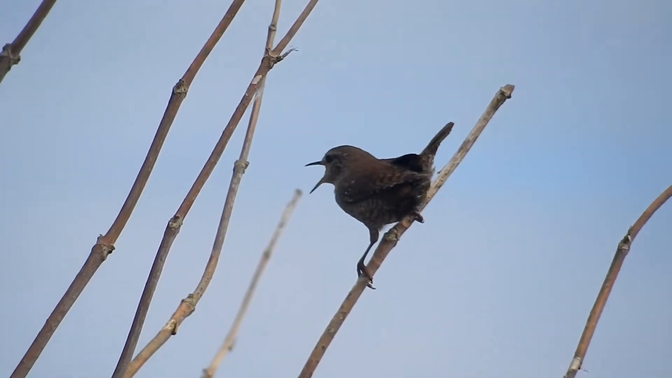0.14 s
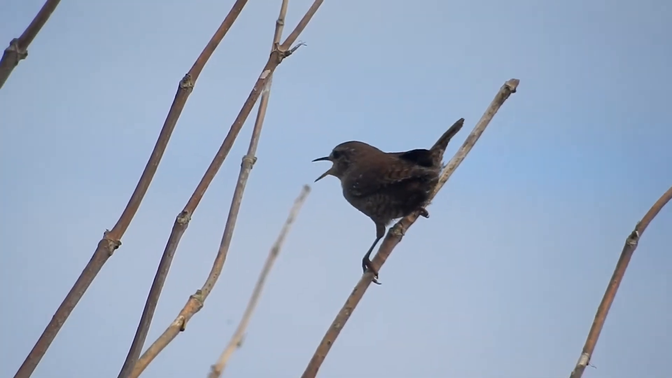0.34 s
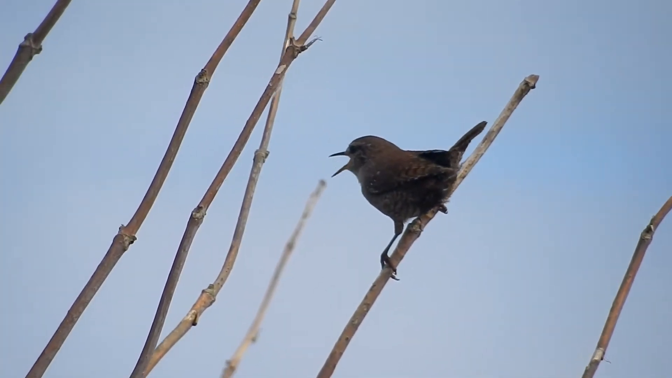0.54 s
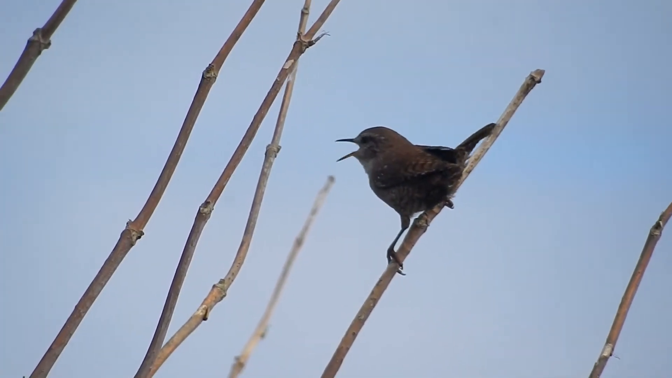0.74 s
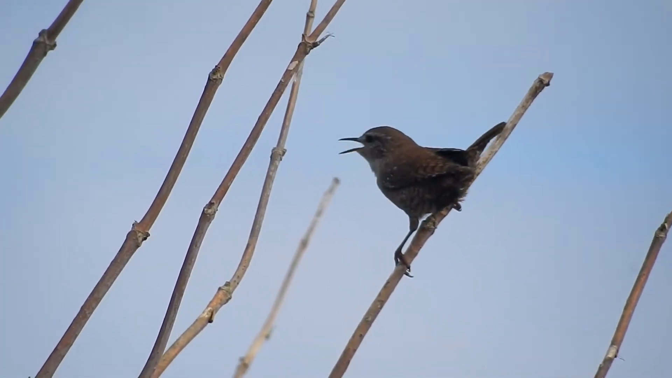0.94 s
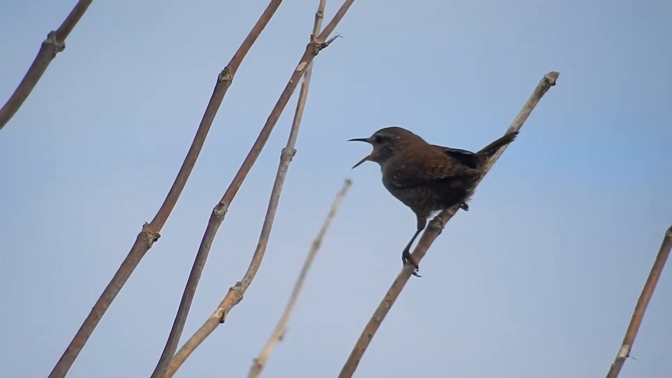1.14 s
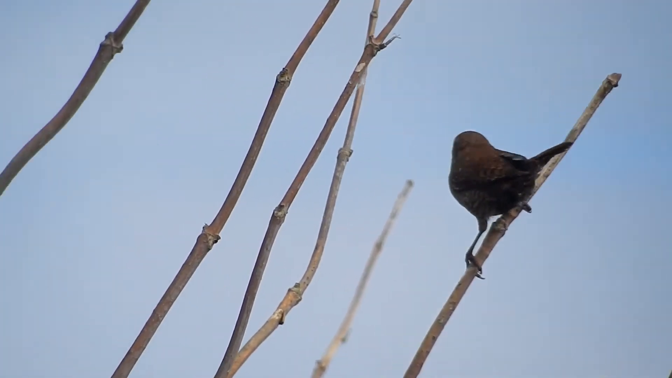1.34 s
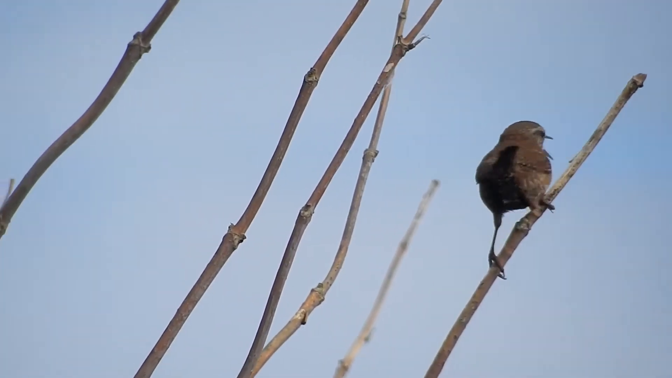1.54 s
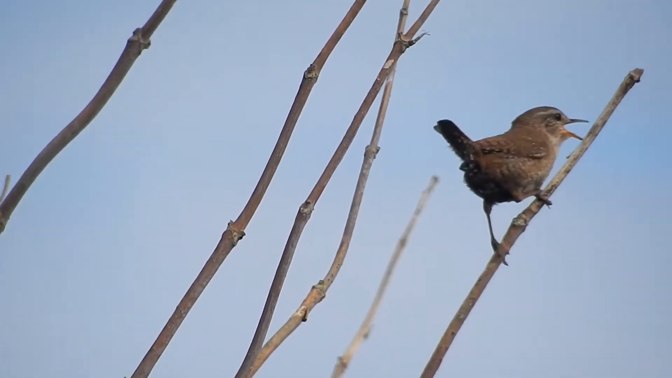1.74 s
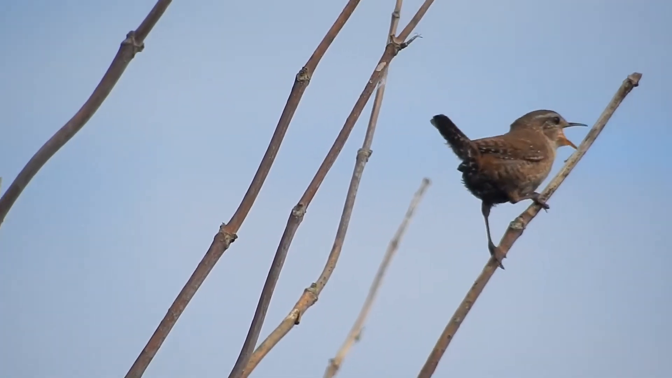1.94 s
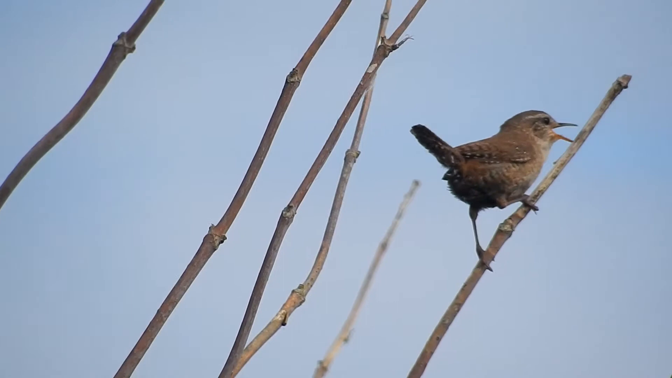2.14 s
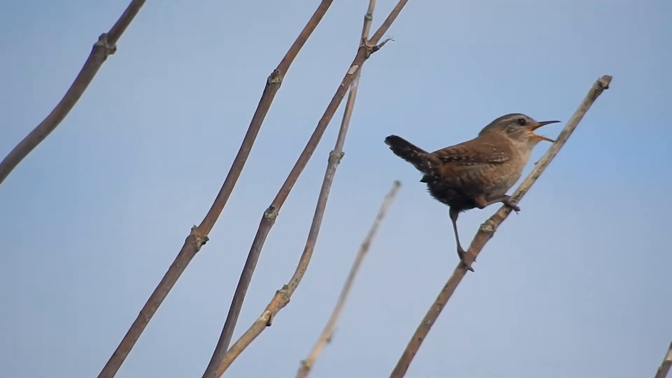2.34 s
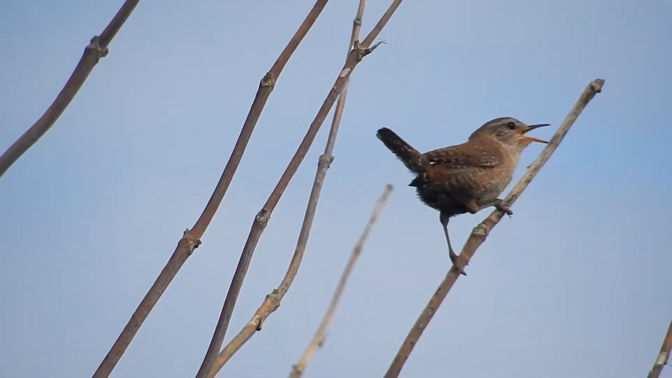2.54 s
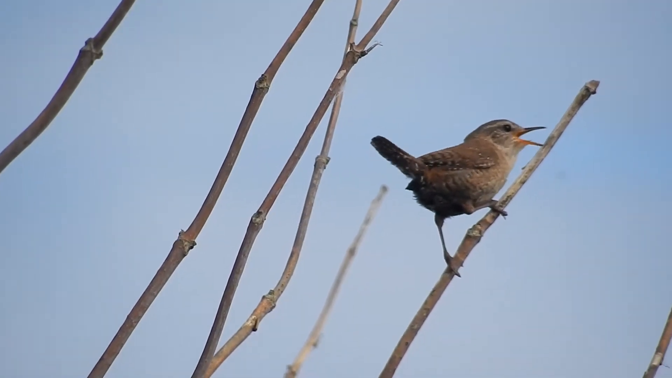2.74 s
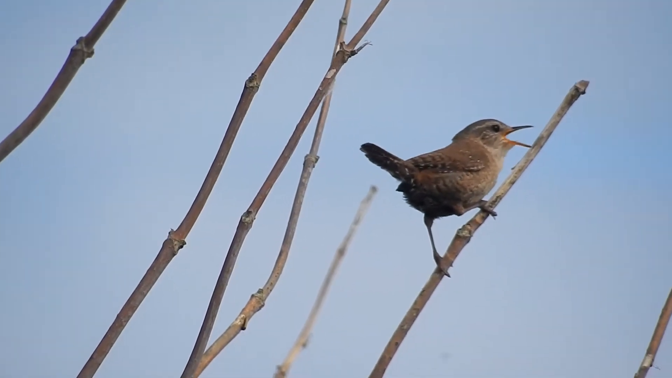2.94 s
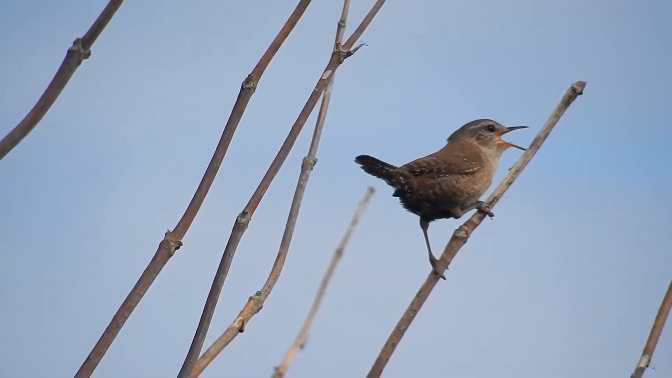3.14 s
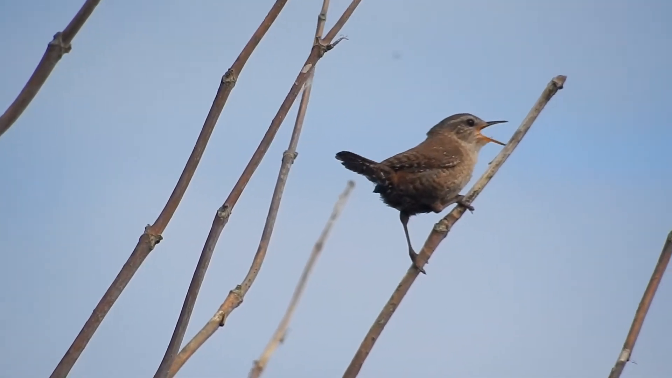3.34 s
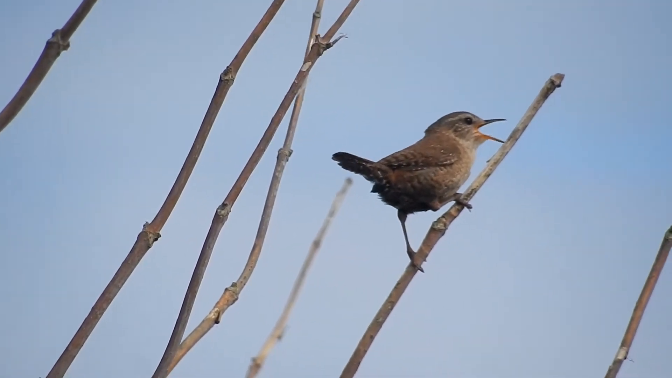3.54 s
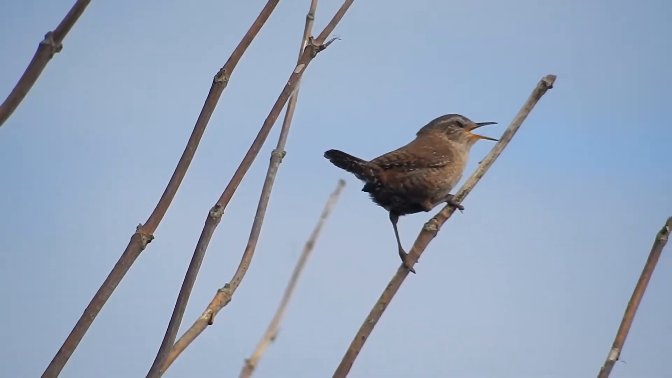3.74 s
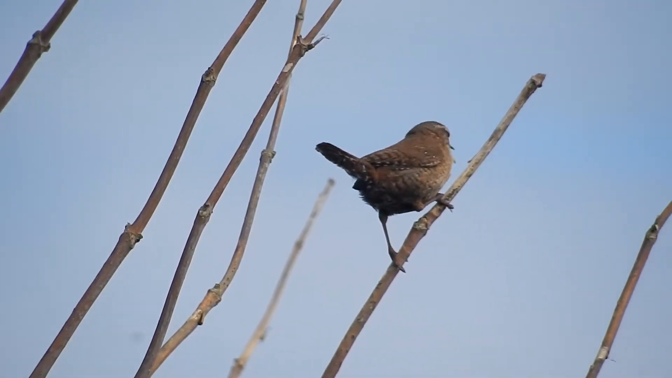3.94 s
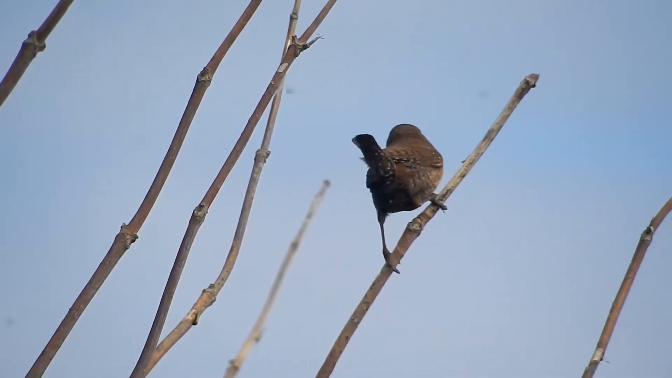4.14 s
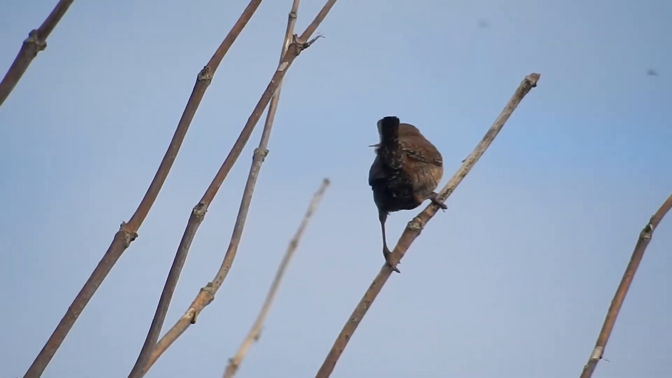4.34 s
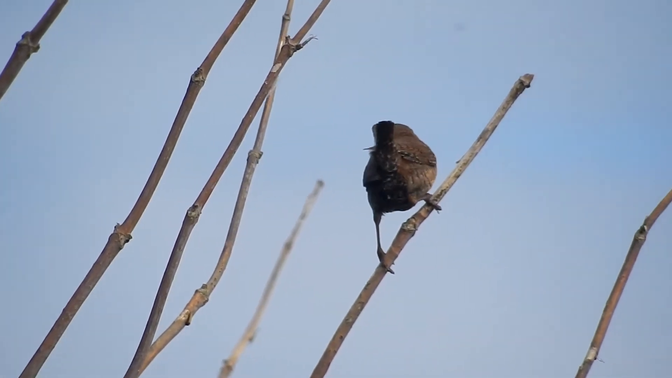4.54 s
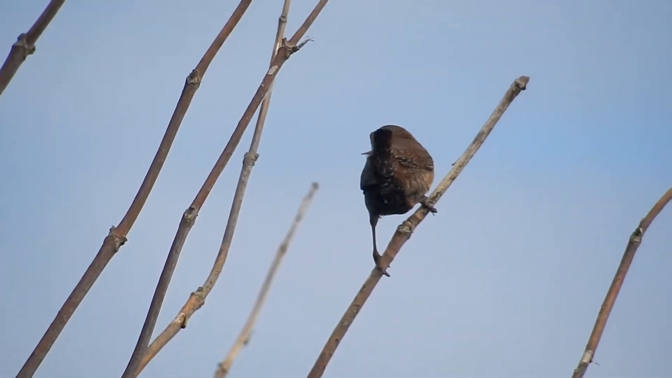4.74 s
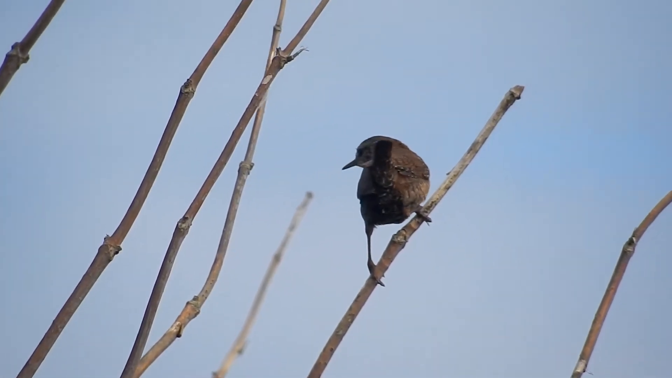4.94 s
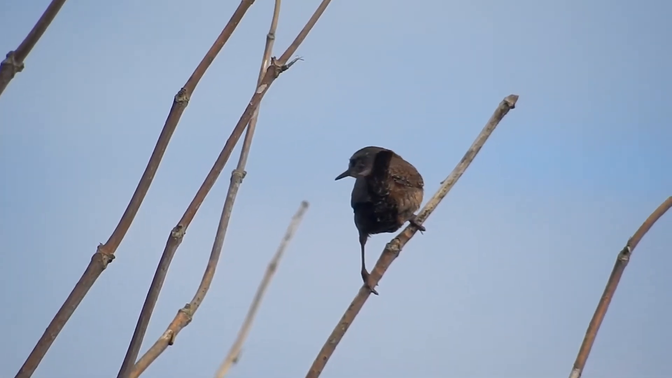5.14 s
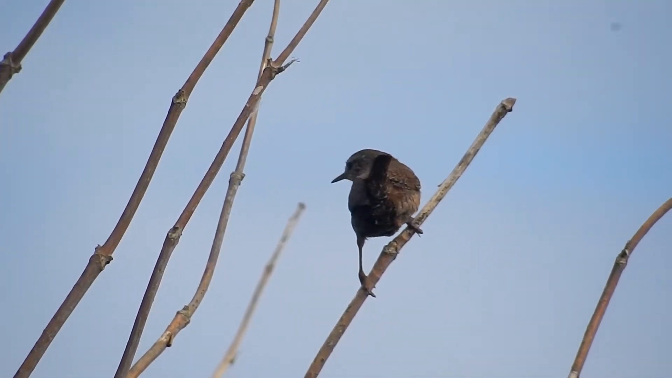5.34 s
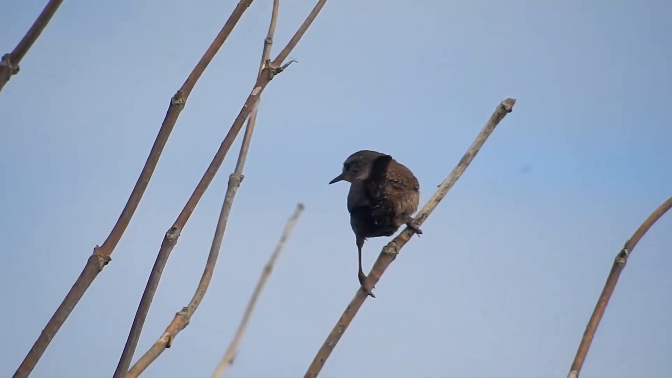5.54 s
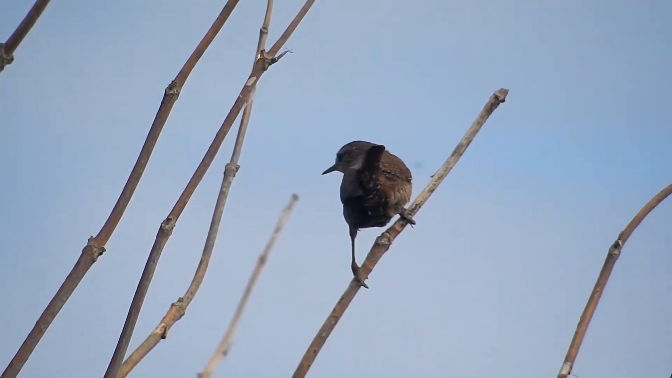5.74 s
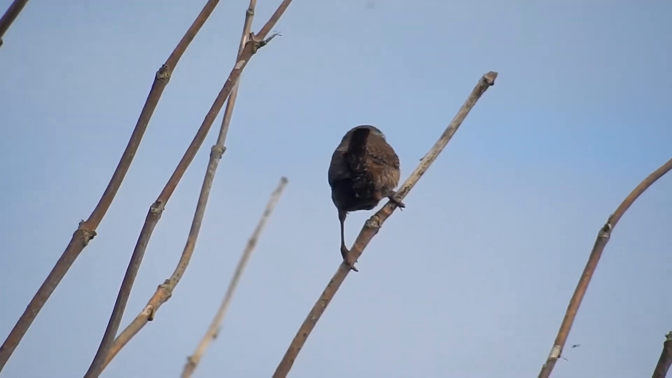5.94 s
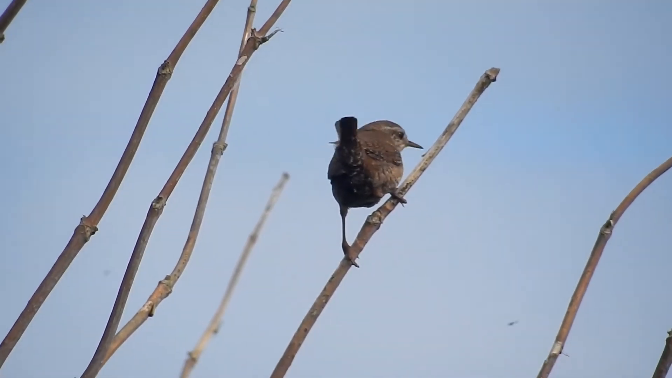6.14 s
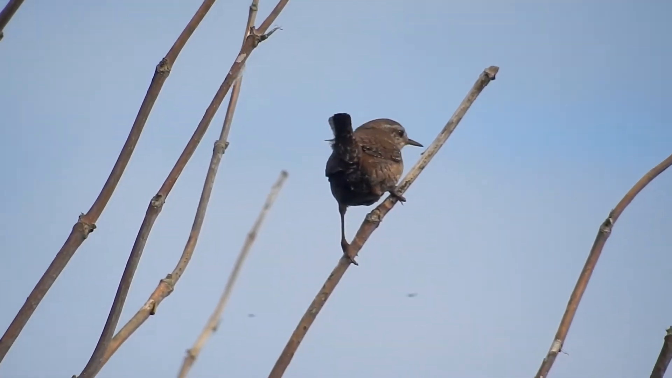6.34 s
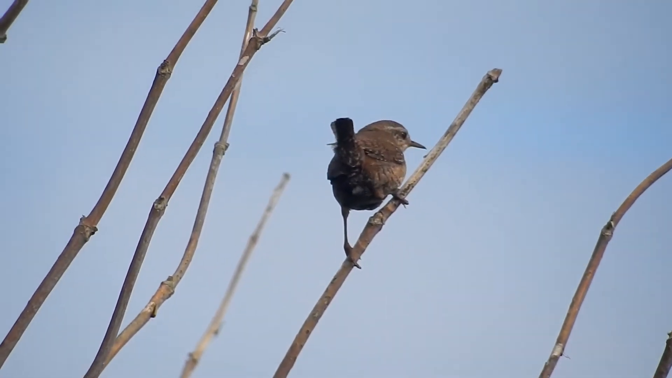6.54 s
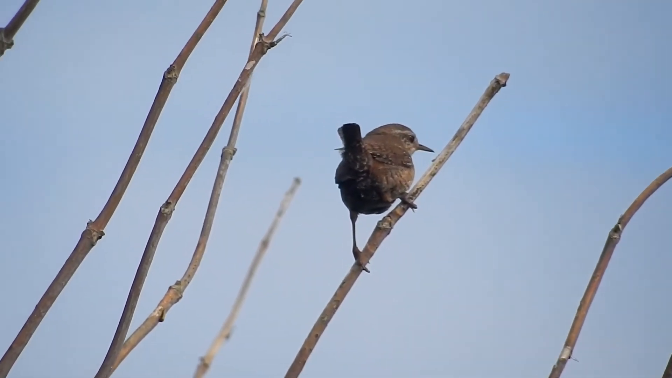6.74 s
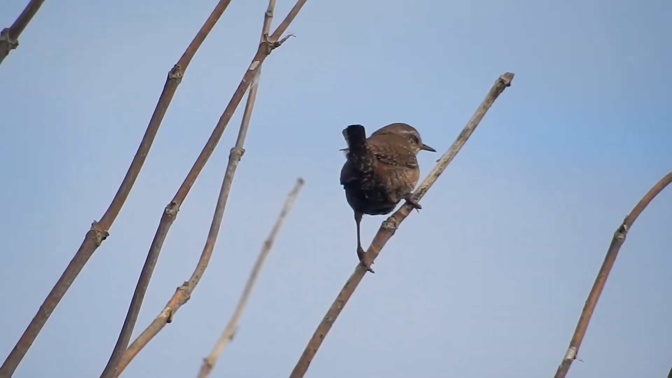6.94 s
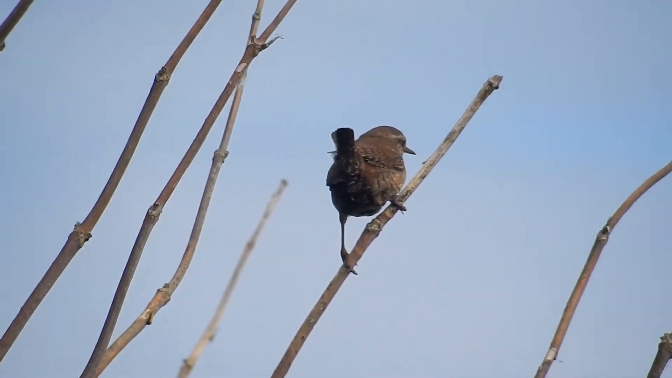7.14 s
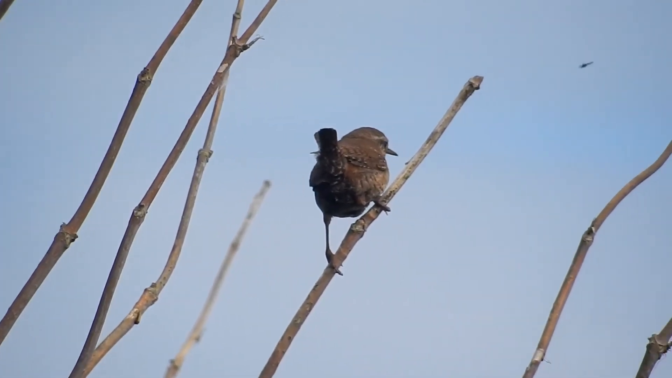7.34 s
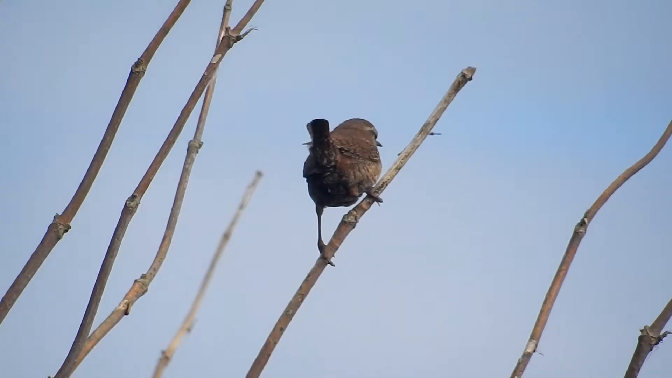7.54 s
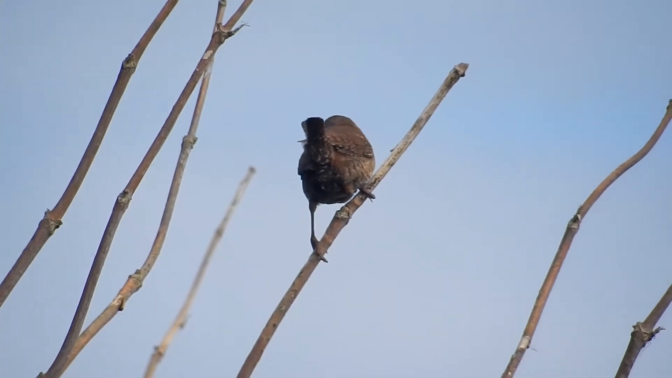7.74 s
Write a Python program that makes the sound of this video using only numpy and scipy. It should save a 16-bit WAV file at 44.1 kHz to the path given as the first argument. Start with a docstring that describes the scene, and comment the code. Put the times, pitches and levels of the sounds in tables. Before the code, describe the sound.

From the very start a wren sings loudly close ahead, in the centre. Until about 1.55 s come quick, separate whistles, some falling steeply, some arching up to around 8 kHz, with a tiny stutter of pips near 0.7 s; two barely audible soft flicks of movement fall near 1.4 and 1.5 s. A dry, rapid rattle of alternating weak and strong ticks runs from 1.6 to 2.1 s, growing slightly, followed by a few whistles. From 2.6 to 3.8 s seven pulsing trill syllables, each pips plus an arched whistle, slow and weaken slightly. Three last notes end at about 4.3 s. Short scattered echoes trail each note. For the remainder, to about 7.9 s, only faint far birds give thin blurred slurs and chirps. Light wind rumbles low and unevenly on the microphone throughout, with early thumps and more around 4.3-4.7 s, above quiet outdoor hiss.

```python
"""A wren on a bare twig starts at once with slurred whistles and one stutter of pips.
It flicks round on its perch, then sings a dry rattle, a trill of arched syllables and three last notes.
Its notes are nearly pure gliding tones with faint overtones, and scrub and trees scatter each one back.
All along, shaped noise makes light wind rumbling on the microphone and a quiet outdoor hiss.
Other birds call far off, as thin slurs blurred by echoes."""
import sys
import numpy as np
from scipy import signal
from scipy.fft import rfft, irfft, next_fast_len
from scipy.io import wavfile
from scipy.ndimage import uniform_filter1d

SR = 44100
rng = np.random.default_rng(int(sys.argv[2]) if len(sys.argv) > 2 else 0)


def store_pcm(level_fs):
    """Save levels as 16-bit WAV."""
    pcm = np.round(np.clip(level_fs, -1, 1) * 32767).astype(np.int16)
    wavfile.write(sys.argv[1], SR, np.atleast_2d(pcm).T)


N = 347508
TIME = np.arange(N) / SR  # seconds


def from_db(db):
    """Turn decibels into gain."""
    return 10 ** (np.asarray(db) / 20)


def rms_one(x):
    """Scale a sound to an rms (average strength) of 1."""
    return x / np.sqrt(np.mean(x ** 2) + 1e-20)


def at_hz(points, hz):
    """Read a curve of (Hz, value) points along a log-frequency axis."""
    known_hz, values = np.transpose(points)
    return np.interp(np.log(hz + 0.0011), np.log(known_hz), values)


def add(track, start_s, sound):
    """Mix a sound into a track from a given time on."""
    at = max(round(start_s * SR), 0)
    track[at:at + len(sound)] += sound[:max(N - at, 0)]


def drift(rate, size=N):
    """Slow random wandering with a spread near 1, changing about `rate` times a second."""
    pole = np.exp(-2 * np.pi * rate / SR)
    run_in = SR // 5  # samples that let the filter settle, then are dropped
    noise = rng.standard_normal(size + run_in)
    return rms_one(signal.lfilter([1], [1, -2 * pole, pole * pole], noise))[-size:]


def band(x, low_hz, high_hz):
    """Keep one band of pitches, with gentle edges."""
    edges_hz = [low_hz, min(high_hz, SR / 2 - 1000)]
    return signal.sosfilt(signal.butter(2, edges_hz, "band", fs=SR, output="sos"), x)


def stereo_noise(spectrum, likeness):
    """Coloured noise of rms 1; its two channels are as alike as asked at each frequency."""
    size = next_fast_len(N)
    hz = np.fft.rfftfreq(size, 1 / SR)
    mid, side = rfft(rng.standard_normal((2, size)))
    alike = np.clip(at_hz(likeness, hz), -1, 1)
    pair = np.sqrt(1 + alike) * mid + np.sqrt(1 - alike) * side * [[1], [-1]]
    # fade out above the last point of the spectrum
    roll_off = 1 / (1 + (hz / (2 * spectrum[-1][0])) ** 4)
    colour = roll_off * from_db(at_hz(spectrum, hz))
    return rms_one(irfft(pair * colour, size)[:, :N])


def wren():
    """The whole strophe: slides and arches, a stutter of pips, the rattle and the trill."""
    # whistles that settle on a pitch, then glide: start_s, length_s, settle_s [s],
    # entry_hz, settled_hz, last_hz, bow_hz (bow of the glide) [Hz], first_db, last_db [dB]
    slides = [(0, 0.039, .002, 3900, 3910, 3586, 30, -15.5, -26.5),
              (0.286, .265, .016, 7904, 7476, 7068, -10.5, -16.5, -33),
              (0.575, 0.08, .013, 4110, 4080, 3704, 10, -27, -20),
              (0.74, 0.055, 0.0028, 4890, 4860, 3084, -260, -15.5, -28),
              (.902, 0.05, 0.003, 4730, 4662, 4438, -49.5, -16.5, -23.5),
              (1.008, .108, .010, 2690, 2943, 3378, 0, -34, -24.5),
              (1.368, .053, .005, 4520, 5150, 3266, -210, -16, -24),
              (2.237, 0.087, .029, 5596, 4835, 4615, -1.5, -15.5, -19.5),
              (3.888, .084, 0.019, 4990, 4770, 4792, -29.5, -18, -24),
              (4.126, 0.16, .038, 7310, 5530, 6000, 254, -24, -29.5)]
    # whistles that rise, hold and fall: start_s, length_s, rise_s, fall_s [s],
    # entry_hz, top_hz, exit_hz, droop_hz (droop of the top) [Hz], level_db, sag_db (mid-note), swell_db [dB]
    arches = [(.086, 0.091, .011, 0.038, 4730, 5290, 4460, 19, -18, -1, 1.5),
              (0.212, 0.02, 0.0062, 0.012, 2920, 3170, 2740, -1, -39, -6, -2),
              (0.846, 0.056, 0.023, .040, 5520, 7210, 4600, -0.5, -19, 4, 8),
              (1.176, .166, .024, .048, 7720, 8257, 6940, 279, -22, 12, 1),
              (1.475, .088, 0.0088, 0.026, 4780, 5210, 4490, -89.5, -17, 0, 2),
              (2.126, .051, .029, 0.03, 5500, 7650, 6580, 0.5, -20.5, -3, -1),
              (2.357, .028, 0.0073, 0.013, 3550, 3945, 3640, -2.5, -27, -6.5, 1.5),
              (2.418, .120, 0.024, 0.03, 5400, 6340, 4940, 17.5, -15.5, 8, 1.5),
              (4.011, 0.03, 0.01, 0.015, 2750, 2960, 2620, -4, -39.5, -2, -2)]
    notes = [slide(*row) for row in slides] + [arch(*row) for row in arches]
    # a stutter of pips leads into the first steep downslur
    notes += lead_in(.743, -22.5, count=4)
    notes += rattle() + trill()
    song = np.zeros(N)
    for start_s, note in notes:
        add(song, start_s, note)
    return song


def slide(start_s, length_s, settle_s, entry_hz, settled_hz, last_hz, bow_hz, first_db, last_db):
    """A whistle that gains force as it settles on its pitch, then follows one bowed glide."""
    onset_db = -19  # how much weaker it is at the very start
    t = np.linspace(0, length_s, num=200)
    unsettled = np.cos(np.pi / 2 * np.clip(t / settle_s, 0, 1)) ** 2
    along = np.clip((t - settle_s) / (length_s - settle_s), 0, 1)  # 0 to 1 through the glide
    hz = settled_hz + (entry_hz - settled_hz) * unsettled
    hz = hz + (last_hz - settled_hz) * along + bow_hz * np.sin(np.pi * along)
    db = first_db + (last_db - first_db) * along + onset_db * unsettled ** 2
    return whistle(np.c_[start_s + t, hz, db], edge_s=.003)


def arch(start_s, length_s, rise_s, fall_s, entry_hz, top_hz, exit_hz, droop_hz, level_db, sag_db, swell_db):
    """A whistle that goes from entry to top pitch, holds and leaves; its level sags or peaks midway."""
    attack_s, release_s, edge_db = .005, .006, -5.5  # softer start and end
    along = np.linspace(0, 1, num=200)
    t = along * length_s
    left_s = length_s - t
    rising = np.clip(1 - t / rise_s, 0, 1) ** 2
    falling = np.clip(1 - left_s / fall_s, 0, 1) ** 1.6  # the fall steepens as it goes
    held_hz = top_hz - droop_hz * along
    hz = held_hz + (entry_hz - held_hz) * rising + (exit_hz - held_hz) * falling
    edges = np.clip(np.maximum(1 - t / attack_s, 1 - left_s / release_s), 0, 1)
    sag = sag_db * np.sin(np.pi * along) ** 2
    force_db = level_db - sag + swell_db * (along - .5) + edge_db * edges
    return whistle(np.c_[start_s + t, hz, force_db], edge_s=.002)


def rattle():
    """Weak and strong ticks in turn, at a steady rate, growing slowly louder."""
    # one tick, a very steep downsweep:
    # time_s from its peak [s], pitch_hz [Hz], level_db against the tick's own level [dB]
    tick = [(-.0048, 7090, -23), (-.002, 6460, -7), (-.0005, 5250, 0), (.0004, 4600, 0.5),
            (.0022, 4120, -18)]
    start_s, pair_every_s, second_tick_s = 1.5953, .0591, .0285
    first_db, growth_db_per_s, second_tick_db = -28.5, 3.5, 3
    scatter_share = .015  # chance spread of pitch, as a share of it
    ticks = []
    for pair in range(9):
        since_s = pair * pair_every_s
        s = start_s + since_s
        db = first_db + growth_db_per_s * since_s
        ticks.append(blip(tick, s, db, scatter_share))
        ticks.append(blip(tick, s + second_tick_s, db + second_tick_db, scatter_share))
    return ticks


def trill():
    """Three pips and an arch, over and over, slowing, sinking and weakening as the bird runs down."""
    start_s, every_s, slowing_s = 2.606, .1797, .00057
    length_s, growth_s, rise_s, fall_s = .111, 0.00074, .043, 0.032
    entry_hz, top_hz, exit_hz, droop_hz = 4680, 6158, 4934, 110
    first_db, lead_in_db, sag_db, swell_db = -14.5, -1.5, 9, -.5
    # change of the top pitch, level and sag from one syllable to the next
    step_hz, step_db, step_sag_db = -21, -0.32, 1
    notes = []
    for k in range(7):
        s = start_s + k * every_s + k * k * slowing_s
        db = first_db + k * step_db
        notes += lead_in(s, db + lead_in_db, count=3)
        notes.append(arch(s, length_s + k * growth_s, rise_s, fall_s,
                          entry_hz, top_hz + k * step_hz, exit_hz, droop_hz,
                          db, sag_db + k * step_sag_db, swell_db))
    return notes


def lead_in(note_s, last_db, count):
    """A quick crescendo of pips that leads up to a note starting at note_s."""
    # one pip, a quick flick up and down:
    # time_s from its peak [s], pitch_hz [Hz], level_db against the pip's own level [dB]
    pip = [(-.004, 4150, -19), (-.002, 4600, -5), (-.0004, 5120, 1), (.0009, 5050, .5), (.0027, 4300, -15)]
    every_s, lead_s, growth_db = .0101, .0086, 3.5
    pips = []
    for back in range(count):  # counted backwards from the last pip
        s = note_s - lead_s - back * every_s
        pips.append(blip(pip, s, last_db - back * growth_db, pitch_scatter=0.024))
    return pips


def blip(gesture, peak_s, level_db, pitch_scatter):
    """One tick or pip with a little noise on it, never at quite the same pitch."""
    pitch = 1 + pitch_scatter * rng.standard_normal()
    contour = np.array(gesture) * [1, pitch, 1] + [peak_s, 0, level_db]
    start_s, tone = whistle(contour, edge_s=.0007)
    roughness = from_db(-29.5) * rng.standard_normal(len(tone))  # chance roughness of level, against the tone
    return start_s, tone * (1 + roughness)


def whistle(contour, edge_s=.0015, waver=0.0024, flutter_db=2.0, loud_db=-18, reedy=0.494):
    """A nearly pure tone from the voice organ along (s, Hz, dB) points; returns its start and sound."""
    # overtones that pass the throat and beak: overtone_hz [Hz], level_db against the note [dB]
    overtones = [(7000, -56), (10000, -45), (12000, -39.5), (14000, -38), (15700, -36.5)]
    s, hz, db = np.transpose(contour)
    s = np.sort(s)
    t = np.arange(s[0] - edge_s / 2, s[-1] + edge_s / 2, 1 / SR)
    # muscles cannot turn a corner: pitch and level are both rounded
    lines = [np.interp(t, s, hz), np.interp(t, s, db)]
    glide_hz, force_db = uniform_filter1d(lines, int(2 * edge_s * SR) + 1, mode="nearest")
    wavering_hz = glide_hz * (1 + waver * drift(150, len(t)))
    phase = 2 * np.pi * np.cumsum(wavering_hz) / SR
    from_edge_s = np.minimum(t - t[0], t[-1] - t)
    gate = np.sin(np.pi / 2 * np.clip(from_edge_s / edge_s, 0, 1)) ** 2
    level = gate * from_db(force_db + flutter_db * drift(60, len(t)))
    second, third = [from_db(at_hz(overtones, k * glide_hz)) * np.sin(k * phase) for k in (2, 3)]
    # the third harmonic grows faster than the note as it is forced
    forced = from_db(reedy * (force_db - loud_db))
    return t[0], level * (np.sin(phase) + second + third * forced)


def flicks(decay_s=0.0051, low_hz=300, high_hz=2400):
    """Brief soft snaps of wings and feet as the bird turns: bursts of noise that die away at once."""
    # each flick: start_s [s], level_db (noise rms before it decays) [dB]
    flick_list = [(1.393, -41), (1.483, -40)]
    out = np.zeros(N)
    t = np.arange(SR // 10) / SR
    for start_s, level_db in flick_list:
        noise = rms_one(band(rng.standard_normal(len(t)), low_hz, high_hz))
        add(out, start_s, from_db(level_db) * np.exp(-t / decay_s) * noise)
    return out


def placed(x):
    """The bird reaches the left microphone a hair earlier, with a balance that depends on pitch."""
    # high notes lean left, low ones right: pitch_hz [Hz], left_minus_right_db [dB]
    lean = [(3000, -2), (5000, -1), (6200, 0.5), (7500, 0), (12000, 1.5)]
    lead_s = 8.5e-6
    size = next_fast_len(N)
    hz = np.fft.rfftfreq(size, 1 / SR)
    # each side takes half of the balance and half of the time lead
    left = from_db(at_hz(lean, hz) / 2) * np.exp(1j * np.pi * hz * lead_s)
    return irfft(rfft(x, size) * np.array([left, 1 / left]), size)[:, :N]


def turned_to_scrub(song):
    """As the bird turns, more or less of its voice goes into the scrub."""
    # voice sent out to be echoed: time_s [s], gain_db [dB]
    turned = [(0, 3.5), (.9, 7), (1.5, 4.5), (1.65, 7.5), (2.08, 8.5), (2.16, 4.5), (3, 4), (4.2, 4.5)]
    return song * from_db(np.interp(TIME, *np.transpose(turned)))


def scatter(x, first_s, last_s, t60, per_s, apart):
    """Many small echoes off twigs and ground, fading 60 dB in t60 seconds, nearly alike left and right."""
    t = np.arange(SR) / SR
    arrives = (rng.random(SR) < per_s / SR) & (t > first_s) & (t < last_s)
    mid, side = rng.standard_normal((2, SR)) * arrives * from_db(-60 * t / t60)
    echoes = mid + apart * side * np.array([[1], [-1]])
    echoes = echoes / np.sqrt(np.sum(echoes ** 2) / 2 + 1e-20)
    return signal.fftconvolve(x[None], echoes, axes=1)[:, :N]


def far_birds(trim_db=-1.5):
    """Thin slurs from other birds, blurred by the trees between."""
    # the clearest far notes: start_s, length_s [s], first_hz, middle_hz, last_hz [Hz],
    # level_db (before the trim on all far birds) [dB]
    far_calls = [(0, .31, 1980, 1800, 1657, -58), (.299, 0.029, 3100, 2900, 2650, -51),
                 (.39, 0.028, 3400, 3210, 2660, -51.5), (.485, .031, 3200, 3100, 2750, -50),
                 (1.283, 0.052, 2900, 3090, 2580, -51), (3.541, 0.053, 3200, 3630, 3580, -50),
                 (3.842, 0.087, 3400, 3680, 3510, -51.5), (4.11, .18, 2790, 2694, 2630, -57),
                 (4.322, 0.072, 2840, 2700, 2580, -52), (4.507, 0.048, 2330, 2850, 3450, -51),
                 (4.572, .048, 4300, 4370, 4390, -55), (4.587, .055, 2880, 2720, 2580, -54),
                 (4.649, .14, 2480, 2390, 2350, -61), (4.93, 0.061, 3100, 3570, 4050, -53),
                 (5.009, 0.059, 3050, 3540, 3960, -52), (5.16, .064, 3080, 3380, 3900, -56),
                 (5.24, 0.052, 3000, 3450, 3980, -52.5), (5.391, 0.12, 5150, 5030, 5350, -62),
                 (5.76, 0.052, 6200, 6380, 5700, -62), (6.521, 0.091, 3050, 3690, 4230, -62),
                 (6.583, .22, 2200, 2100, 2000, -63.5), (6.772, 0.039, 3300, 3730, 4300, -59.5),
                 (6.897, 0.058, 5980, 6400, 4720, -58), (6.958, 0.05, 3620, 3560, 3490, -56),
                 (7.24, .035, 4050, 4110, 4100, -55), (7.28, .06, 3770, 3650, 2930, -58.5),
                 (7.579, 0.025, 3100, 3240, 3340, -55.5), (7.598, 0.076, 5830, 5640, 6050, -56.5),
                 (7.687, .11, 3430, 3330, 3740, -58.5), (7.69, .063, 2463, 2350, 2210, -56),
                 (7.78, .05, 2310, 2210, 2110, -54), (7.791, 0.057, 3900, 4250, 4560, -57.5)]
    # stretches of chance notes: from_s, to_s [s], centre_hz [Hz], spread [octaves],
    # slope [share of pitch], level_db (typical, before the trim) [dB]
    chorus_stretches = [(.25, 3.8, 3300, .25, -.02, -56.5), (4.4, 7.85, 3900, .55, .07, -65),
                        (6.1, 7.85, 3600, 0.98, 0.0395, -64.5), (5.4, 8.7, 6100, .2, -0.021, -70.5)]
    rows = list(far_calls)
    for stretch in chorus_stretches:
        rows += list(chorus(*stretch))
    calls = np.zeros(N)
    for row in rows:
        add(calls, *slur(*row))
    echoes = from_db(-4) * scatter(calls, first_s=.003, last_s=.5, t60=.45, per_s=3000, apart=.5)
    return from_db(trim_db) * (calls + echoes)


def chorus(from_s, to_s, centre_hz, octaves, slope, level_db, count=18):
    """Faint chance notes of other birds, in the columns of the far calls; one falls in each time slot."""
    when, length, pitch, tilt, loud = rng.random((count, 5)).T
    start_s = from_s + (to_s - from_s) * (np.arange(count) + when) / count
    length_s = .025 + .04 * length
    hz = centre_hz * 2 ** (octaves * (pitch - .5))
    bend = slope + .25 * (tilt - .5)
    note_db = level_db + 5 * (loud - .5)
    return np.c_[start_s, length_s, hz * (1 - bend), hz, hz * (1 + bend), note_db]


def slur(start_s, length_s, first_hz, middle_hz, last_hz, level_db):
    """A far bird's note: one curved glide that swells and fades."""
    along = np.linspace(0, 1, num=9)
    curve = np.polyfit([0, .5, 1], [first_hz, middle_hz, last_hz], 2)
    hz = np.polyval(curve, along)
    swell_db = -6 * (2 * along - 1) ** 2
    contour = np.c_[start_s + length_s * along, hz, level_db + swell_db]
    return whistle(contour, edge_s=.005, waver=.008, flutter_db=2.5)


def wind():
    """A light breeze that buffets the microphone and also sways the air slowly."""
    # strength of the breeze, before each layer's own settings: time_s [s], level_db [dB]
    breeze = [(0, -41), (1.3, -41), (2.2, -43.5), (2.8, -48.5), (3.4, -43), (4, -47), (4.6, -39),
              (5.6, -44), (6.9, -47.5), (7.88, -43)]
    breeze_db = np.interp(TIME, *np.transpose(breeze))
    return buffeting(breeze_db) + swaying(breeze_db)


def buffeting(breeze_db, lumpy_db=2.5, lean_db=2.5, trim_db=-1):
    """Eddies swell and pass; each microphone port is hit mostly on its own, the right one harder."""
    # the strongest eddies: middle_s, length_s [s], level_db (before trim and lean) [dB]
    gusts = [(.145, 0.071, -34.5), (0.469, 0.031, -27), (0.727, 0.036, -27.5), (0.941, 0.045, -32),
             (1.101, 0.028, -24), (1.494, 0.049, -33), (1.69, 0.057, -28.5), (3.879, 0.051, -33),
             (4.302, 0.026, -29), (4.513, 0.063, -30), (4.684, .043, -29), (6.338, 0.021, -33.5)]
    # colour of the rumble: pitch_hz [Hz], relative_db [dB per Hz]
    buffet_colour = [(40, -25.5), (60, 1), (85, 0.5), (120, -1.5), (170, -9), (240, -18), (350, -35.5),
                     (600, -41.5)]
    power = from_db(breeze_db) ** 2
    for middle_s, length_s, level_db in gusts:
        bump = np.exp(-np.minimum((2 * (TIME - middle_s) / length_s) ** 2, 20))
        power = power + from_db(level_db) ** 2 * bump
    lumps = from_db(lumpy_db * np.array([drift(30), drift(24)]))
    noise = stereo_noise(buffet_colour, [(60, 0.31), (250, .25)])
    buffet = np.sqrt(power) * from_db(trim_db) * rms_one(lumps * noise)
    return buffet * from_db([[-lean_db], [lean_db]])


def swaying(breeze_db, level_db=-46.0, follows=.55, wander_db=2):
    """Very low noise that partly follows the breeze and partly wanders in level."""
    # colour of the sway: pitch_hz [Hz], relative_db [dB per Hz]
    sway_colour = [(15, -8), (30, -2), (50, -2.5), (70, -6.5), (120, -33)]
    swell_db = level_db + follows * (breeze_db - breeze_db.mean()) + wander_db * drift(3)
    return from_db(swell_db) * stereo_noise(sway_colour, [(20, .02), (60, .05)])


def air(hiss_db=-53):
    """Steady distant hiss, made of coloured noise, with two faint narrow whines in it."""
    # colour of the hiss: pitch_hz [Hz], relative_db [dB per Hz]
    air_colour = [(90, -9.5), (150, -1.5), (300, -7), (600, -13.5), (1100, -16.5), (2000, -18.5),
                  (2600, -22.5), (3800, -21.5), (6000, -29.5), (8500, -33.5), (11000, -37.5), (15500, -37)]
    # how alike left and right are: pitch_hz [Hz], correlation [1 = the same]
    air_likeness = [(150, .35), (600, 0.55), (1400, 0.5), (4000, 0.77), (9000, .3), (15000, 0.2)]
    # the whines: centre_hz, width_hz [Hz], level_db [dB]
    whine_list = [(1138.5, 28, -69), (1855, 48, -74)]
    whines = np.zeros(N)
    for hz, width_hz, level_db in whine_list:
        narrow = band(rng.standard_normal(N), hz - width_hz / 2, hz + width_hz / 2)
        whines += from_db(level_db) * rms_one(narrow)
    return from_db(hiss_db) * stereo_noise(air_colour, air_likeness) + whines


def scene(scrub_db=-15.0, trees_db=-30):
    """The wren close ahead, echoes from scrub and farther trees, and the background."""
    song = wren() + flicks()
    thrown = turned_to_scrub(song)
    scrub = scatter(thrown, first_s=.003, last_s=.064, t60=.24, per_s=2400, apart=.55)
    trees = scatter(thrown, first_s=0.041, last_s=.9, t60=.45, per_s=2800, apart=0.36)
    near = placed(song) + from_db(scrub_db) * scrub + from_db(trees_db) * trees
    return near + far_birds() + wind() + air()


def record(dry, cutoff_hz=15650):
    """Cut the very top of the sound steeply."""
    return signal.sosfilt(signal.ellip(12, .1, 80, cutoff_hz, fs=SR, output="sos"), dry)


dry = scene()
out = record(dry)
store_pcm(out)
```